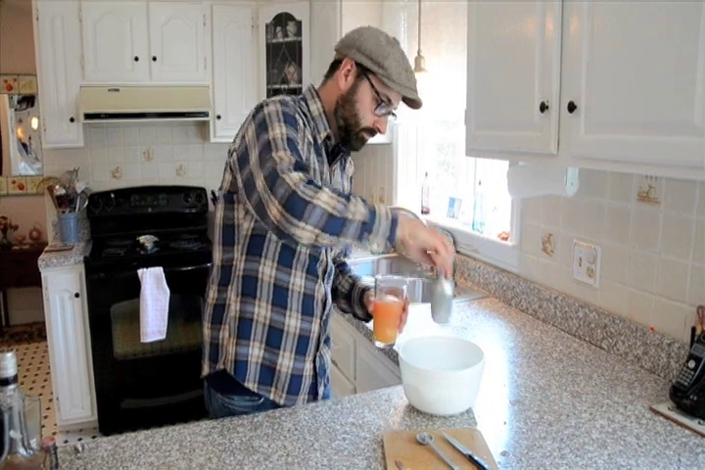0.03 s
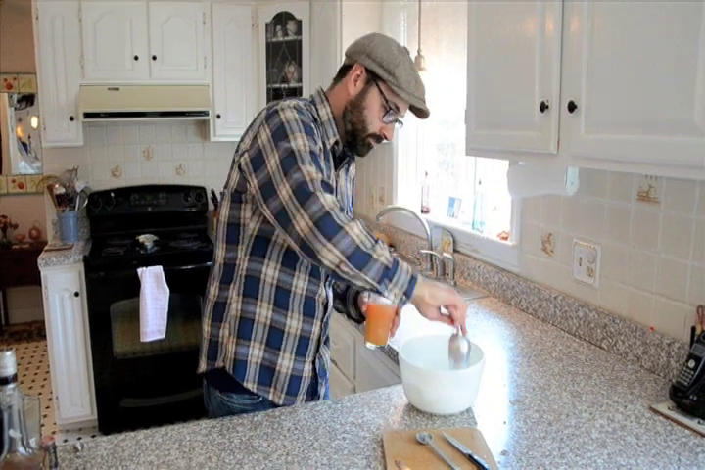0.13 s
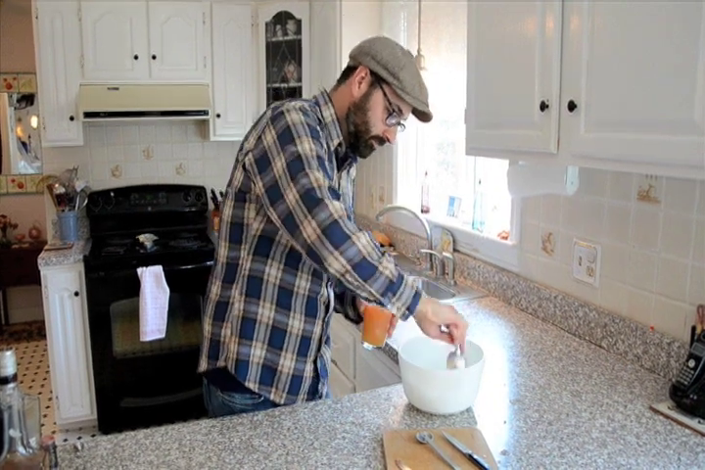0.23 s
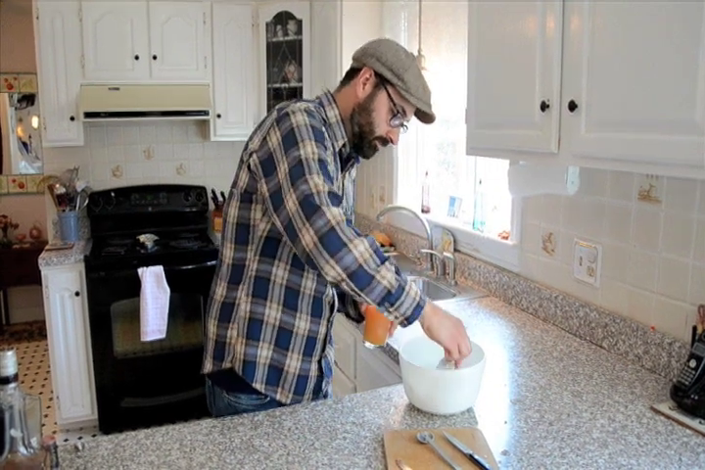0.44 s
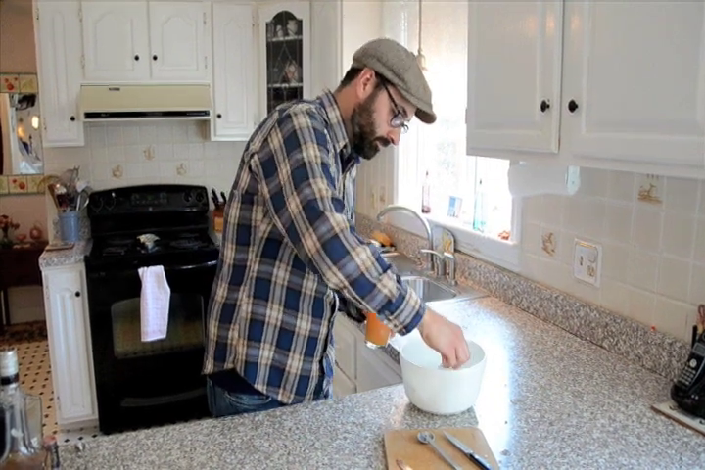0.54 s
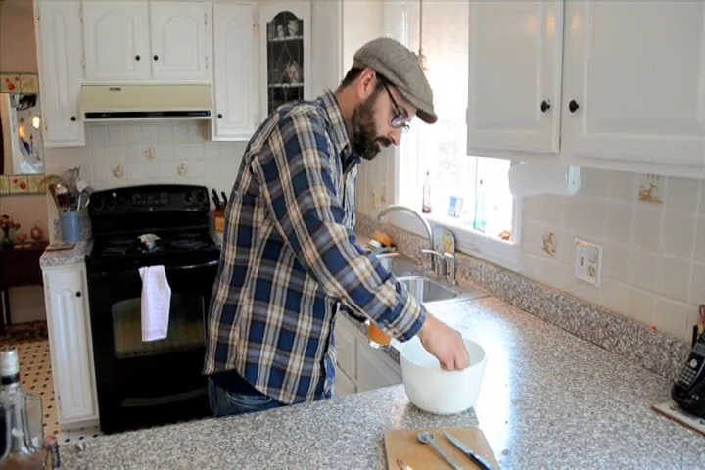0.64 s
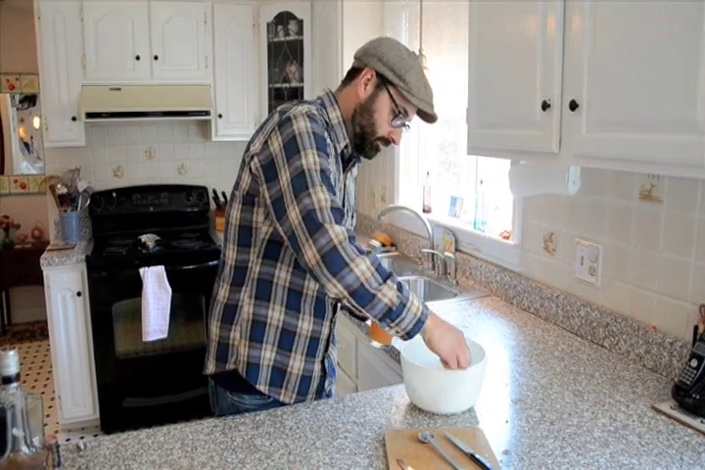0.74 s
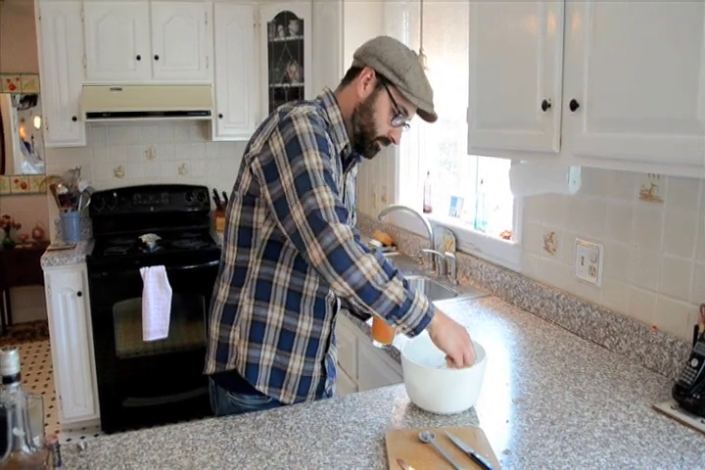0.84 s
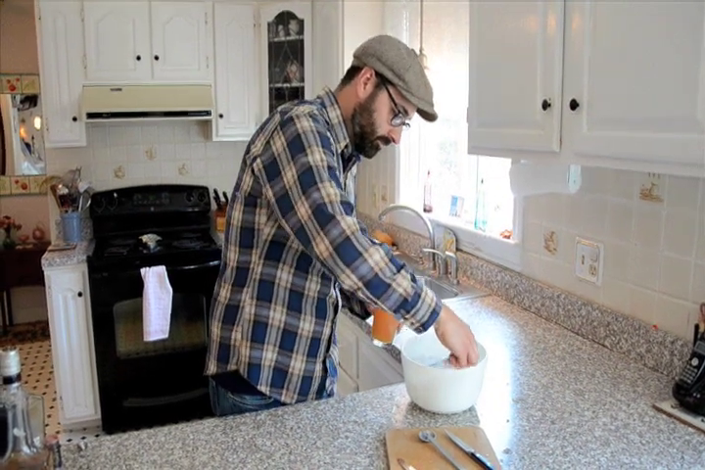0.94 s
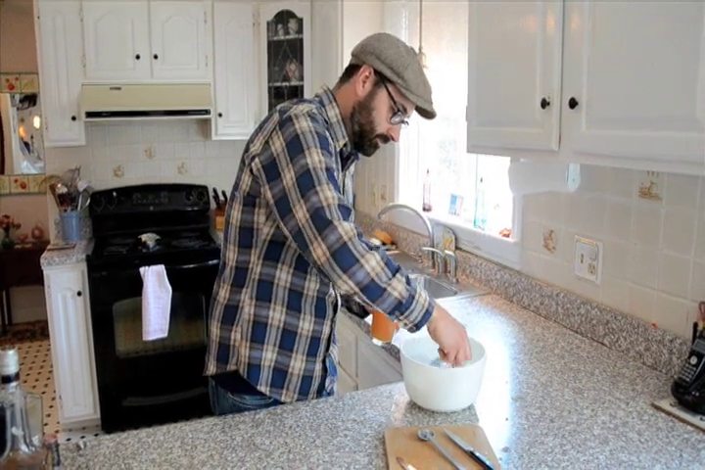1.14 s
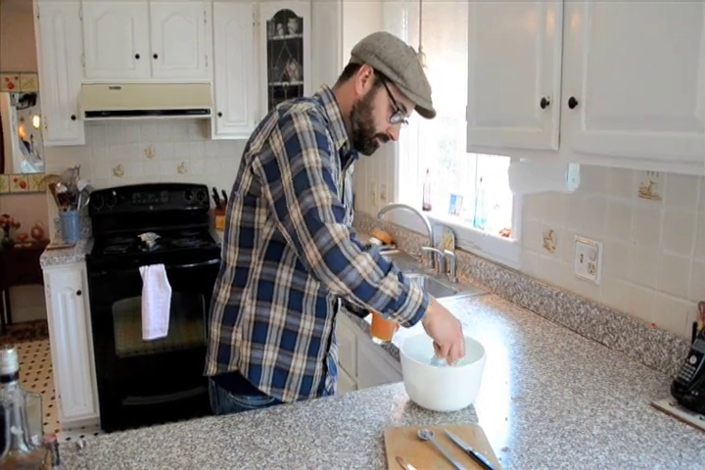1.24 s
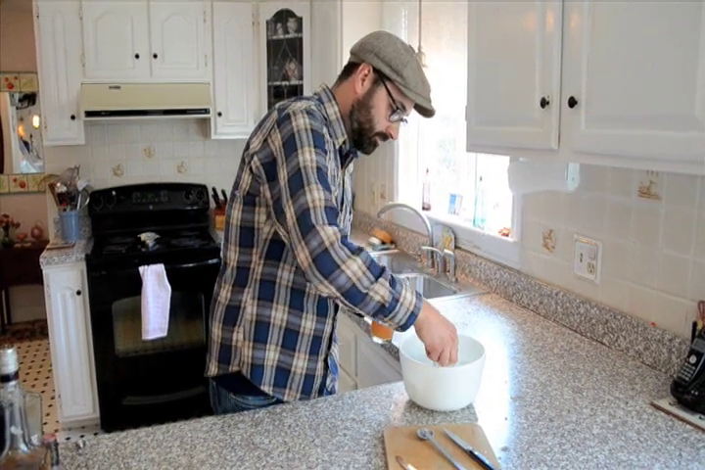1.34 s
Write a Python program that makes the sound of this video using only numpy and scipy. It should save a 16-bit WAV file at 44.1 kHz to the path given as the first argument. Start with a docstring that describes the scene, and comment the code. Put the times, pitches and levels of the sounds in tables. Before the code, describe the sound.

Hard ice cubes rattle and clink against a glazed bowl, then shift in smaller, scattered knocks

```python
"""A soft hush and a thin high whine come first, then a burst of clattering ice, as a hand digs ice cubes
out of a thick glazed bowl in a tiled kitchen. Knocks between cubes are clicks, noise bursts and short notes.
Cubes also hit the bowl wall, which rings in pairs of close pitches. Sliding cubes rustle as many tiny
noise grains, a dull low bump comes near the end, and the room echoes the ice and the bowl."""
import sys
import numpy as np
from scipy import signal
from scipy.fft import rfft, irfft, next_fast_len
from scipy.io import wavfile

SR = 44100  # samples per second
rng = np.random.default_rng(int(sys.argv[2]) if len(sys.argv) > 2 else 0)


def to_wav(sig):
    """Store sig (one row per channel, or 1-D mono) as 16-bit WAV at the path in sys.argv[1].

    Samples outside -1..1 are clipped; the rate is SR.
    """
    pcm = np.clip(np.atleast_2d(sig), -1, 1) * 32767
    pcm = np.round(pcm).astype(np.int16)
    wavfile.write(sys.argv[1], SR, pcm.T)  # frames by channels


N = 61739  # length in samples

MID_HZ = 2500  # tilts turn about this pitch
BASS_CUT_HZ = 55
CUBE_T60 = 0.03  # s for a cube's note, or the shaken wall, to fall by 60 dB
RING_RISE_S = 0.002


def amp(db):
    """Turns decibels into a gain."""
    return 10 ** (np.asarray(db) / 20)


def evened(x):
    """Scales to an rms (average strength) of 1."""
    return x / np.sqrt(np.mean(x ** 2) + 1e-20)


def read(points, hz):
    """Reads a table at any pitch, with straight lines over log frequency."""
    f, value = np.transpose(points)
    return np.interp(np.log(hz + 1), np.log(f + 1), value)


def add(mix, s, sound):
    """Mixes a sound in at time s, cutting it off at the end of the mix."""
    part = mix[round(s * SR):][:len(sound)]
    part += sound[:len(part)]


def colour(points, tilt_db):
    """Filter that responds at once, with the given spectrum at energy 1, then tilted by dB per octave."""
    hz = abs(np.fft.fftfreq(2048, 1 / SR))
    level = evened(amp(read(points, hz)))
    octaves = np.log2(np.clip(hz, 500, 12000) / MID_HZ)
    log_gain = np.log(level * amp(tilt_db * octaves))
    # the Hilbert transform finds the phase that puts the energy as early as possible
    spectrum = np.exp(np.conj(signal.hilbert(log_gain)))
    return np.fft.ifft(spectrum).real[:1024]


def ring(hz, t60, gain, length):
    """One mode (natural pitch): a sine that swells quickly, then dies away by 60 dB in t60 seconds."""
    t = np.arange(0, length, 1 / SR)
    rise = np.minimum(t / RING_RISE_S, 1)
    return gain * amp(-60 * t / t60) * np.sin(2 * np.pi * hz * t) * rise


# shape of the room's hush: f/Hz, level/dB (per Hz, relative)
HUSH_COLOUR = [(25, -48), (65, -14), (144, -20.5), (425, -12.5), (649, -12.5), (741, -14), (5690, -26.5),
               (7610, -28.5), (14000, -49)]
HUSH_DB = -53  # rms level
# steady whine: f/Hz, level/dB (rms)
WHINE = [(15692, -68)]


def hush():
    """Room tone is noise shaped by a table; the thin whine is a steady sine."""
    hz = np.fft.rfftfreq(N, 1 / SR)
    shape = amp(read(HUSH_COLOUR, hz)) * (hz > 20)
    air = irfft(rfft(rng.standard_normal(N)) * shape, N)
    t = np.arange(N) / SR
    whine = sum(np.sqrt(2) * amp(db) * np.sin(2 * np.pi * f * t) for f, db in WHINE)
    return amp(HUSH_DB) * evened(air) + whine


# how long the kitchen's echoes last: f/Hz, time to fall by 60 dB/s
ROOM = [(150, 0.37), (500, 0.48), (2000, 0.45), (6000, 0.35), (14000, 0.22)]
ROOM_GAP_S = 0.004  # wait before the first echo
ICE_ECHO_DB, WALL_ECHO_DB = 0.5, -8.0  # sent to the room, relative to the direct sound


def kitchen(x):
    """Sparse echoes of random sign, each band dying at its own speed; three tails take turns."""
    out, turn = np.zeros(N), np.arange(N) / SR * 9
    for k in range(3):
        taps = np.zeros(SR)
        # one echo, randomly placed, in every 20 samples
        at = np.arange(round(ROOM_GAP_S * SR), SR - 20, 20)
        signs = rng.choice([-1., 1.], SR)[:len(at)]
        shifts = rng.integers(0, 20, SR)[:len(at)]
        taps[at + shifts] = signs
        hz, t, bands = signal.stft(taps, SR, nperseg=256)
        decay = amp(-60 * t / read(ROOM, hz)[:, None])
        tail = signal.istft(bands * decay, SR, nperseg=256)[1]
        # the squares of the three windows add up to 1
        window = np.sqrt(2 / 3) * np.cos(np.pi * (turn + k / 3))
        out += signal.fftconvolve(x * window, tail / np.linalg.norm(tail))[:N]
    return out


THUD_S, THUD_DB, THUD_HZ = 1.342, -39, 503  # start, level, top of the band
THUD_RISE_S, THUD_T60 = 0.0094, 0.47  # s to swell, s to fall by 60 dB


def thud():
    """A dull low bump near the end: low noise that swells quickly and dies away."""
    t = np.arange(N) / SR - THUD_S
    b, a = signal.butter(1, [BASS_CUT_HZ, THUD_HZ], "band", fs=SR)
    low = signal.lfilter(b, a, rng.standard_normal(N))
    rise = np.clip(t / THUD_RISE_S, 0, 1)
    return evened(low) * rise * amp(THUD_DB - 60 * np.maximum(t, 0) / THUD_T60)


# loudness of the sliding ice: t/s, level/dB
RUSTLE = [(0.181, -75), (.21, -40), (.45, -38), (0.661, -43), (.85, -41.5), (1.199, -41.5), (1.26, -58),
          (1.4, -57)]
# tone of the sliding ice: f/Hz, level/dB (per Hz, relative)
RUSTLE_COLOUR = [(59, -63.5), (100, -15), (942, -5.5), (1140, -4), (1960, -8.5), (2520, -5), (8520, -11.5),
                 (15000, -33)]
RUSTLE_PER_S, RUSTLE_SPREAD_DB, GRAIN_S = 2500, 1.5, 0.002  # grains per s, unevenness, time to peak


def rustle():
    """Cubes sliding: many tiny soft grains of noise, of uneven size."""
    size = amp(RUSTLE_SPREAD_DB * np.minimum(rng.exponential(1, N), 4))
    ticks = size * (rng.random(N) < RUSTLE_PER_S / SR)
    u = np.arange(0, 8, 1 / (GRAIN_S * SR))
    swells = signal.oaconvolve(ticks, u * np.exp(-u))[:N]
    grains = rng.standard_normal(N) * swells
    coloured = evened(signal.oaconvolve(grains, colour(RUSTLE_COLOUR, 0))[:N])
    s, db = np.transpose(RUSTLE)
    level = np.interp(np.arange(N) / SR, s, db, left=-120)
    return amp(level) * coloured


# the bowl's paired pitches: first partner f/Hz, second partner f/Hz
BOWL_HZ = [(1143, 1080), (1602, 1665), (2060, 2087), (3212, 3295), (3258, 3342), (4624, 4652), (6140, 6105),
           (7310, 7386), (8053, 8668)]
SHAKE_DB, SHAKE_TILT_DB = -44.5, 6.5  # mode gain at MID_HZ, before ring's 0.63; rise per octave


def shaken(ice):
    """Ice sounds pass a little into the damped wall: a glassy sizzle, strongest in the high modes."""
    modes = 0
    for hz in np.ravel(BOWL_HZ):
        gain = amp(SHAKE_DB + SHAKE_TILT_DB * np.log2(hz / MID_HZ))
        modes = modes + gain * ring(hz, CUBE_T60, 0.63, .05)
    return signal.oaconvolve(ice, modes)[:N]


# strength of each pair in BOWL_HZ: level/dB (relative), time to fall by 60 dB/s
BOWL = [(4, 0.55), (-6.5, 0.7), (4, 0.79), (5.5, 0.3), (6.5, 0.13), (2.5, 0.31), (-6, 0.21), (2.5, 0.12),
        (10, 0.15)]
# cube on the bowl wall: t/s, level/dB, favoured f/Hz, spread/octaves,
# share of second partners (0-1), time until a touch damps it/s
STRIKES = [(.208, -21.5, 3780, 0.69, 0.58, 0.011), (0.228, -19.5, 4080, 0.46, 1, 0.032),
           (.262, -21.5, 3040, 0.43, 0.8, 0.012), (0.335, -23, 4400, 0.33, 0.6, 0.049),
           (0.4042, -22.5, 4350, 0.35, 0.28, 0.026), (.417, -25.5, 2470, 0.44, 0, 0.062),
           (.552, -28, 2080, 0.15, 0, 0.034), (0.601, -32, 1330, .5, 0.1, 0.025),
           (.912, -30, 6200, 0.17, 0, 0.02), (.960, -34.5, 3130, 0.17, 0.2, 0.042),
           (.962, -33, 1390, 0.77, 0.09, 0.11), (1.010, -35, 2060, 0.2, 0.05, 0.099),
           (1.077, -30.5, 2560, 0.22, 0.5, 0.019), (1.077, -26.5, 7160, 0.09, 0.5, 0.1),
           (1.272, -29, 1660, 0.13, 0.97, .14)]
DAMPED_T60 = 0.14  # s for the touch alone to take off 60 dB
RATTLE_DB, RATTLE_S = 1.5, 0.0061  # rms size of the waver, half-length of its smoothing


def bowl():
    """Each strike rings the modes near its favoured pitch; loose cubes on the wall make each mode waver."""
    out = np.zeros((len(BOWL), N))
    signs = rng.choice([-1., 1.], (len(STRIKES), len(BOWL), 2))
    t = np.arange(0, .3, 1 / SR)
    for (s, db, near_hz, spread, second, free_s), sign in zip(STRIKES, signs):
        share = np.clip(second, 0, 1)
        touch = amp(db - 60 * np.maximum(t - free_s, 0) / DAMPED_T60)
        for mode, (first_hz, second_hz), (mode_db, t60), (a, b) in zip(out, BOWL_HZ, BOWL, sign):
            pair = np.sqrt(1 - share) * ring(first_hz, t60, a, .3)
            pair += np.sqrt(share) * ring(second_hz, t60, b, .3)
            favour = np.exp(-.5 * (np.log2(first_hz / near_hz) / spread) ** 2)
            add(mode, s, amp(mode_db) * favour * pair * touch)
    smoothing = np.hanning(round(2 * RATTLE_S * SR))[None]
    waver = signal.oaconvolve(rng.standard_normal(out.shape), smoothing, "same")
    return (out * amp(RATTLE_DB * evened(waver))).sum(axis=0)


# cube on cube: t/s, level/dB, cube pitch f/Hz, tilt/dB per octave
KNOCKS = [(.179, -54.5, 7300, 10.5), (0.2072, -10.5, 2904, -1.5), (0.2107, -9.5, 1360, -0.5),
          (.227, -20, 1420, -4.5), (.243, -17.5, 2250, -4.5), (.259, -12, 2166, 0.5),
          (.267, -17.5, 740, -3), (0.28, -16.5, 7130, 2.5), (.300, -18, 2770, 1.5),
          (0.3353, -15.5, 2256, -1.5), (.343, -16, 1105, -1), (.352, -21, 1686, -1), (.382, -19, 1614, -2),
          (0.404, -24, 3030, -2.5), (.462, -22.5, 1470, -0.5), (0.514, -27, 6150, 2),
          (.521, -20.5, 4780, 0.5), (0.532, -26, 8030, 4), (0.55, -23, 322, 1.5), (0.578, -17, 4120, -0.5),
          (.580, -17, 2970, -0.5), (.582, -23.5, 5560, 0.5), (.594, -21, 2710, -1), (.606, -30.5, 2330, 1),
          (0.781, -32, 1760, 4), (.894, -22.5, 4030, 2.5), (0.897, -22, 3330, 0), (.918, -30, 2540, -7),
          (0.9442, -23.5, 1550, 2.5), (0.952, -24.5, 7700, 1.5), (0.955, -23, 1123, 0),
          (.968, -18, 2058, -1), (0.982, -29, 3530, 3), (1.0752, -19, 1413, -1.5), (1.0777, -20.5, 3338, 0),
          (1.11, -26.5, 3400, -2), (1.18, -39, 7400, 0), (1.2688, -27, 3140, -1), (1.273, -25, 1750, -1.5),
          (1.298, -37.5, 2030, 2.5), (1.358, -27.5, 865, -3)]
# tone of the click and crack: f/Hz, level/dB (per Hz, relative)
KNOCK_COLOUR = [(35, -48), (60, -37), (310, -20.5), (460, -22.5), (727, -14), (960, -21), (1330, -7),
                (2420, -8.5), (3340, -9), (4020, -12), (8820, -18), (14000, -40.5)]
CRACK_RISE_S, CRACK_T60 = 0.00034, 0.03  # s to swell, s to fall by 60 dB
CLICK_DB, CUBE_DB = 12.5, -0.5  # gains of click and cube note within a knock


def knocks():
    """Each knock: a click, a crack of noise and a short note of the cube."""
    ice, t = np.zeros(N), np.arange(0, .05, 1 / SR)
    noise = rng.standard_normal((len(KNOCKS), len(t)))
    bursts = noise * np.minimum(t / CRACK_RISE_S, 1) * amp(-60 * t / CRACK_T60)
    click = amp(CLICK_DB) * (t == 0)
    for (s, db, hz, tilt_db), burst in zip(KNOCKS, bursts):
        crack = signal.oaconvolve(burst + click, colour(KNOCK_COLOUR, tilt_db))[:len(t)]
        note = amp(CUBE_DB) * ring(hz, CUBE_T60, 1, .05)
        add(ice, s, amp(db) * (crack + note))
    return ice


def scene():
    """Ice and bowl, direct and echoed, over the hush."""
    b, a = signal.butter(2, BASS_CUT_HZ, "high", fs=SR)
    ice = signal.lfilter(b, a, knocks() + rustle() + thud())
    wall = bowl() + shaken(ice)
    echoes = kitchen(amp(ICE_ECHO_DB) * ice + amp(WALL_ECHO_DB) * wall)
    return (ice + wall + echoes + hush())[None]


# peaks and dips of the microphone housing: f/Hz, width/Hz, level/dB
HOUSING = [(5676, 414, -5), (6210, 210, 5.5), (6830, 180, -5), (7700, 320, 2.5)]
EDGE_HZ = 16400  # top of the band


def record(dry):
    """The microphone housing lifts and dips some pitches, then a filter removes the highest treble."""
    size = next_fast_len(N + SR // 10)
    hz = np.fft.rfftfreq(size, 1 / SR)
    housing_db = sum(db * np.exp(-.5 * ((hz - f) / w) ** 2) for f, w, db in HOUSING)
    heard = irfft(rfft(dry, size) * amp(housing_db), size)[:, :N]
    low_pass = signal.firwin(1023, EDGE_HZ, window=("kaiser", 12), fs=SR)
    return signal.oaconvolve(heard, low_pass[None], "same")


dry = scene()
out = record(dry)
to_wav(out)
```